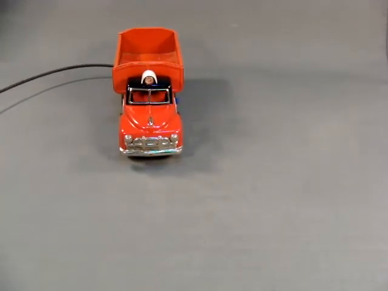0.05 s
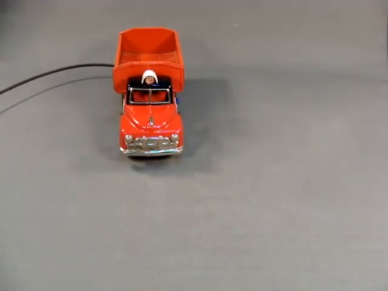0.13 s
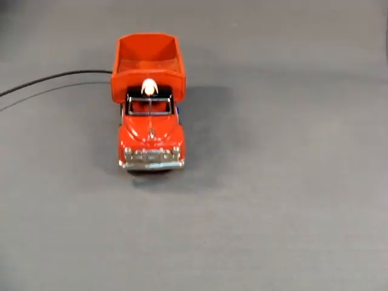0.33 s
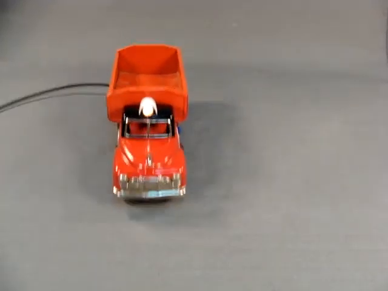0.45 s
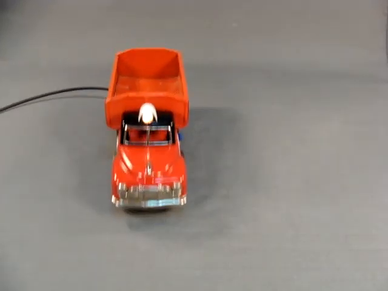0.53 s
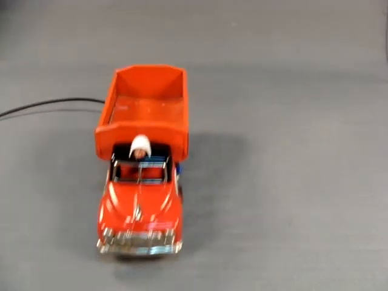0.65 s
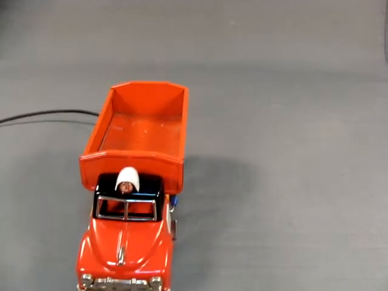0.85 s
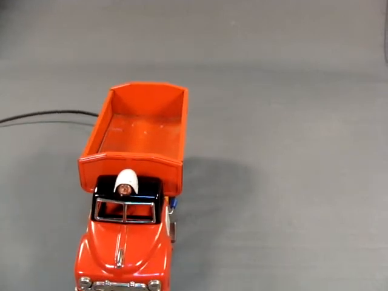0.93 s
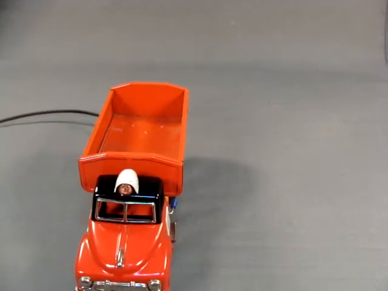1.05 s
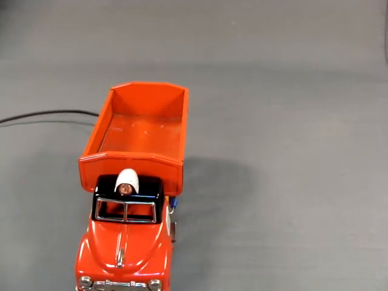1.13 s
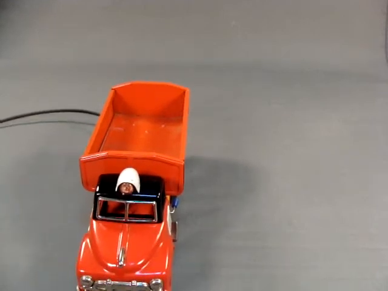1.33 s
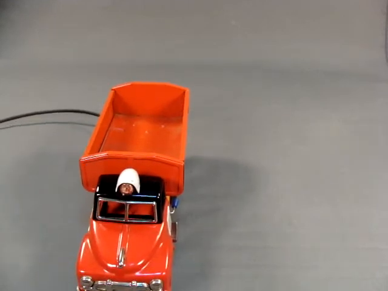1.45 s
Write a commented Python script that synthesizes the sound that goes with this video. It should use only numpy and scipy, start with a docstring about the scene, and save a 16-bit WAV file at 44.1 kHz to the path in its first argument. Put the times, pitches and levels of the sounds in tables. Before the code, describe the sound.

A tin toy truck rolls over a table, close by in a quiet room. From 0.1 seconds its gears tick lightly and an axle gives tiny high squeaks. At 0.2 a dull knock starts a chattering, tinny whirr, loudest around 0.4, over a faint low table hum. The drive runs down by 1 second. Soft handling clicks and faint scraping follow until about 1.5 seconds.

```python
"""A tin toy truck rolls a short way across a table, close to the microphone, in a quiet room.
Its gears take up with a few ticks and a dry axle squeaks. The chassis jolts and the drive whirrs:
teeth chatter into the ringing tin body while the wheels make the table top hum.
The drive runs down, and the toy clicks and scrapes faintly as it is handled."""
import sys
import numpy as np
from scipy import signal
from scipy.fft import rfft, irfft
from scipy.io import wavfile
from scipy.ndimage import uniform_filter1d

SR = 44100
rng = np.random.default_rng(int(sys.argv[2]) if len(sys.argv) > 2 else 0)


def generate_wav(sig):
    """Save sig (samples, or channels by samples) to the path in sys.argv[1] as 16-bit PCM at SR."""
    pcm = np.round(np.clip(np.atleast_2d(sig).T, -1, 1) * 32767).astype(np.int16)
    wavfile.write(sys.argv[1], SR, pcm)


N = 66150

# The gears taking up. Each row: start in seconds, level in dB, decay in seconds.
GEAR_TICKS = [(0.0981, -37.5, 0.0071), (0.113, -41.5, 0.0036), (0.1257, -38, 0.0043),
              (0.1413, -39.5, 0.011), (0.16, -44, 0.018), (0.177, -43.5, 0.0094), (0.195, -46, 0.012),
              (0.212, -34, 0.0059)]
# Tone of the ticks. Each row: frequency in Hz, relative level in dB.
TICK_EQ = [(150, -28), (950, -2.5), (1300, 7), (1600, 4), (1950, 3), (2700, -2), (3900, -5.5), (4350, -5),
           (4800, -4.5), (7200, 2.5), (10000, -24)]
# Modes the ticks ring. Each row: frequency in Hz, relative level in dB, t60 in seconds.
DRIVE_MODES = [(1245, -1, .08), (1354, 2, .05), (2505, -8.5, 0.092), (4486, -4, .05)]
# Chirps of the dry axle. Each row: start in seconds, length in seconds, level in dB.
AXLE_CHIRPS = [(0.146, .023, -34.5), (0.178, .014, -35.5), (0.192, 0.015, -39.5)]
# Tone of the axle's rasp. Each row: frequency in Hz, relative level in dB.
RASP_EQ = [(3000, -60), (7000, -24), (8000, -8), (8600, 1), (8900, -3), (9300, -28)]
# The drive winding up and running down. Each row: time in seconds, share of top speed.
DRIVE_SPEED = [(0.21, .25), (0.3, .7), (0.42, 1.0), (0.62, .92), (0.8, .7), (0.93, 0.36), (1.04, 0.16)]
# Meshing gear pairs. Each row: teeth per second at top speed, relative level in dB.
GEAR_MESHES = [(172, -3), (465, -1.5), (790, 1.5)]
# How hard the teeth chatter. Each row: time in seconds, relative level in dB.
CHATTER_FADER = [(0.205, -59), (0.214, -45), (0.229, -37), (0.234, -21), (0.266, -23.5), (0.295, -16.5),
                 (0.38, -12.5), (0.48, -15), (0.602, -18.5), (0.613, -24.5), (0.629, -17.5), (0.705, -19.5),
                 (0.756, -22), (0.775, -21), (0.86, -23), (0.935, -30.5), (0.99, -44.5), (1.06, -54)]
# Tone of the chatter in the panels. Each row: frequency in Hz, relative level in dB.
CHATTER_EQ = [(100, -34.5), (270, -35.5), (370, -27), (520, -41.5), (660, -16.5), (790, -9.5), (950, -16.5),
              (1250, -5), (2150, 1), (2750, -5), (3250, 3), (4150, -3.5), (4550, -8), (5100, -1.5),
              (5600, -7), (6650, -4), (8500, -4.5), (9300, -8.5), (10500, -20)]
# Ring of the tin body. Each row: frequency in Hz, relative level in dB, t60 in seconds.
BODY_MODES = [(768.3, -20.5, 0.12), (857, -16.5, 0.12), (1073, -9, 0.046), (1226, -6.5, 0.12),
              (1378.7, 2, 0.12), (1568.5, -8, 0.19), (1689, -4.5, 0.077), (2095, -1, 0.065),
              (2427, -8, 0.23), (3080, 0, 0.083), (3210, -11, 0.055), (3470, -3.5, 0.029),
              (3820, -4.5, 0.041), (4000, -1, 0.13), (4155, -1, 0.1), (6644, -1, 0.017)]
# Brightness of the whirr. Each row: time in seconds, treble gain in dB.
WHIRR_BRIGHTNESS = [(0.24, -1.5), (0.42, -0.5), (0.58, 2.5), (0.75, 2), (0.88, -3.5), (1.0, -5.5)]
# Tone of the chassis knock. Each row: frequency in Hz, relative level in dB.
JOLT_EQ = [(100, -17), (250, -33), (380, -5.5), (520, -8), (860, 7.5), (1100, -27), (3000, -2),
           (10000, -32)]
# The table top humming under the wheels. Each row: time in seconds, level in dB.
HUM_FADER = [(0.2, -80), (0.25, -62), (0.29, -55), (0.332, -73), (0.38, -46.5), (0.44, -58.5),
             (0.48, -58.5), (0.575, -70), (0.636, -49.5), (0.76, -53), (0.89, -64.5), (1.1, -63)]
# Handling clicks. Each row: start in seconds, level in dB, decay in seconds, treble gain in dB.
HANDLING_CLICKS = [(1.0616, -34, .005, -14), (1.067, -32.5, .004, -20), (1.256, -42, 0.0058, 12.5),
                   (1.269, -46, 0.013, 1), (1.296, -55, 0.0049, 6), (1.3227, -50, 0.014, 3),
                   (1.3524, -38.5, .007, -12), (1.394, -34.5, .006, -11), (1.4, -36.5, .006, -18),
                   (1.4284, -45, .008, -8)]
# Tone of the clicks. Each row: frequency in Hz, relative level in dB.
CLICK_EQ = [(150, -32), (700, -36), (1100, -8), (1380, -1.5), (1650, -13), (2100, 1), (2600, -7.5),
            (3200, 3.5), (4000, -7.5), (4900, -6.5), (6600, -1), (10000, -14)]
# Faint scraping under the hand. Each row: time in seconds, level in dB.
SCRAPE_FADER = [(1.19, -57.5), (1.24, -50), (1.33, -52), (1.43, -52.5), (1.5, -53.5)]
# Tone of the scraping. Each row: frequency in Hz, relative level in dB.
SCRAPE_EQ = [(40, -4), (170, 4), (400, 0.5), (480, -5), (570, 14.5), (680, -2), (1300, -4.5), (2000, 0.5),
             (3200, -0.5), (4800, -7.5), (6600, -7), (10000, -11.5)]
# The room's low background. Each row: frequency in Hz, relative level in dB.
ROOM_EQ = [(20, -12), (45, 2), (68, -6), (98, 1.5), (135, -5.5), (350, -7), (600, -6.5), (1200, -11.5),
           (3000, -14), (4500, -18.5), (10000, -24)]


def undb(db):
    """Decibels to gain."""
    return 10 ** (np.asarray(db) / 20)


def unit(x):
    """Scale to rms 1."""
    return x / np.sqrt(np.mean(x ** 2) + 1e-18)


def curve(rows):
    """Join (seconds, value) points by straight lines."""
    return np.interp(np.arange(N) / SR, *np.array(rows).T)


def fader(rows, fade_s=.042):
    """Ride the gain through (seconds, dB) points, fading away outside them."""
    t = np.arange(N) / SR
    outside = np.maximum(rows[0][0] - t, 0) + np.maximum(t - rows[-1][0], 0)
    return undb(curve(rows)) * np.exp(-outside / fade_s)


def drift(per_s):
    """Smooth random motion with rms 1."""
    hold = max(int(SR / per_s), 1)
    steps = rng.standard_normal(N)[np.arange(N) // hold]
    return unit(uniform_filter1d(steps, hold))


def convolve(x, response):
    """Play a sound through an impulse response."""
    return signal.fftconvolve(x, response)[:N]


def eq(x, points, size=8192):
    """Minimum-phase EQ through (Hz, dB) points, with unit power gain."""
    hz, db = np.array(points).T
    bin_hz = np.arange(size // 2 + 1) * SR / size
    gain = unit(undb(np.interp(np.log(bin_hz + 1), np.log(hz), db)))
    cepstrum = irfft(np.log(gain))
    cepstrum[1:size // 2] *= 2  # folded forward, so nothing rings ahead of a hit
    cepstrum[size // 2 + 1:] = 0
    return convolve(x, irfft(np.exp(rfft(cepstrum))))


def treble(x, db, corner_hz=4590):
    """High shelf: brighten or dull a sound."""
    low = signal.sosfiltfilt(signal.butter(2, corner_hz, fs=SR, output="sos"), x)
    return low + undb(db) * (x - low)


def tail(t60):
    """Dense tail of unit energy that falls 60 dB in t60 seconds."""
    t = np.arange(N // 4) / SR
    response = rng.standard_normal(len(t)) * np.exp(-np.log(1000) * t / t60)
    return response / np.linalg.norm(response)


def grains(per_s=4000):
    """Dense tiny slips of metal on metal."""
    return unit(np.sign(rng.standard_normal(N)) * (rng.random(N) < per_s / SR))


def burst(start, db, decay_s, rise_s=.0015):
    """A quick run of slips that dies away."""
    age = np.maximum(np.arange(N) / SR - start, 0)
    envelope = np.minimum(age / rise_s, 1) * np.exp(-np.maximum(age - rise_s, 0) / decay_s)
    return undb(db) * envelope * grains()


def panels(force, count=6, clatter_db=1.5):
    """Every contact shakes one of several panels, each with its own short clatter."""
    panel = rng.integers(0, count, N)
    clatter = sum(convolve(force * (panel == k), tail(t60=.017)) for k in range(count))
    return (force + undb(clatter_db) * clatter) / np.hypot(1, undb(clatter_db))


def struck_tin(force, panel_eq, modes, ring_db):
    """A sharp contact, a short clatter of panels and the ring of the metal's modes."""
    t = np.arange(N // 4) / SR
    ring = 0
    for hz, db, t60 in modes:
        envelope = undb(db) / np.sqrt(t60) * np.exp(-np.log(1000) * t / t60)
        ring += envelope * np.sin(2 * np.pi * (hz * t + rng.random()))
    return eq(panels(force), panel_eq) + undb(ring_db) * convolve(force, ring / np.linalg.norm(ring))


def room_tone(db=-53.5):
    """A soft, dark bed of steady noise."""
    return undb(db) * unit(eq(rng.standard_normal(N), ROOM_EQ))


def gear_ticks():
    """The first slow teeth slip one by one and ring the drive."""
    slips = sum(burst(*row) for row in GEAR_TICKS)
    return struck_tin(slips, TICK_EQ, DRIVE_MODES, ring_db=-2)


def axle_squeak(hz=4290, wander=.016, fundamental_db=-13, rasp_db=-2):
    """A dry axle gives raspy chirps, mostly on its second harmonic."""
    t = np.arange(N) / SR
    phase = 2 * np.pi * np.cumsum(hz * (1 + wander * drift(per_s=2000))) / SR
    tone = unit(np.sin(2 * phase) + undb(fundamental_db) * np.sin(phase))
    rasp = undb(rasp_db) * unit(eq(grains(), RASP_EQ))
    swells = 0
    for start, length, db in AXLE_CHIRPS:
        progress = np.clip((t - start) / length, 0, 1)
        swells += undb(db) * np.sqrt(np.abs(np.sin(np.pi * progress)))
    return swells * unit(tone + rasp)


def gear_whirr(scatter_db=1, wobble_db=1, rub_db=-4.5):
    """Each mesh strikes tooth by tooth, unevenly, and rubs between strikes; the body radiates it."""
    jitter, rub_decay = .12, .31  # shares of one tooth's turn
    speed = curve(DRIVE_SPEED)
    chatter = 0
    for tooth_rate, db in GEAR_MESHES:
        early_late, soft_hard = rng.standard_normal((N // 20, 2)).T
        teeth_passed = np.cumsum(tooth_rate * speed) / SR
        teeth = np.arange(int(teeth_passed[-1]))
        hit_at = np.minimum(np.searchsorted(teeth_passed, teeth + jitter * early_late[teeth]), N - 1)
        strikes = np.bincount(hit_at, undb(scatter_db * soft_hard[teeth]), N)
        strikes /= np.sqrt(speed)  # the same power at any speed
        strikes -= uniform_filter1d(strikes, N // 100)  # take out the steady push
        rub = rng.standard_normal(N) * np.exp(-(teeth_passed % 1) / rub_decay)
        force = unit(strikes) + undb(rub_db) * unit(rub)
        chatter += force * undb(db + wobble_db * drift(per_s=70))
    whirr = struck_tin(chatter * fader(CHATTER_FADER) / 2, CHATTER_EQ, BODY_MODES, ring_db=-6)
    return treble(whirr, curve(WHIRR_BRIGHTNESS))


def chassis_jolt():
    """The chassis knocks dully as the wheels start."""
    return eq(panels(burst(start=.233, db=-35, decay_s=.014)), JOLT_EQ)


def table_hum(hz=94.6, wander=.015):
    """The rolling wheels keep a low resonance of the table top going."""
    phase = 2 * np.pi * np.cumsum(hz * (1 + wander * drift(per_s=18))) / SR
    return fader(HUM_FADER) * unit(np.sin(phase))


def handling_clicks(ring_time_share=.45):
    """Short bursts of slips, duller or brighter, strike a body whose ring the hand damps."""
    slips = sum(treble(burst(start, db, decay_s), treble_db)
                for start, db, decay_s, treble_db in HANDLING_CLICKS)
    damped_modes = [(hz, db, t60 * ring_time_share) for hz, db, t60 in BODY_MODES]
    return struck_tin(slips, CLICK_EQ, damped_modes, ring_db=-8.5)


def handling_scrape(roughness_db=2.9):
    """The toy shifts under the hand with a faint, uneven grain."""
    slips = grains() * undb(roughness_db * drift(per_s=60.38))
    return fader(SCRAPE_FADER) * unit(eq(slips, SCRAPE_EQ))


def scene():
    """The toy up front with a touch of small room, over the table's hum and the room tone, in mono."""
    toy = (gear_whirr() + chassis_jolt() + gear_ticks()
           + handling_clicks() + axle_squeak() + handling_scrape())
    bed = room_tone()
    reverb = undb(-19) * convolve(toy, tail(t60=.26))
    return (toy + reverb + table_hum() + bed)[None]


def record(dry):
    """A soft limiter rounds the highest peaks, then a steep filter cuts the top."""
    top_hz = 10000
    high_cut = signal.ellip(12, .2, 85, top_hz, fs=SR, output="sos")
    return signal.sosfilt(high_cut, np.tanh(dry))


dry = scene()
out = record(dry)
generate_wav(out)
```